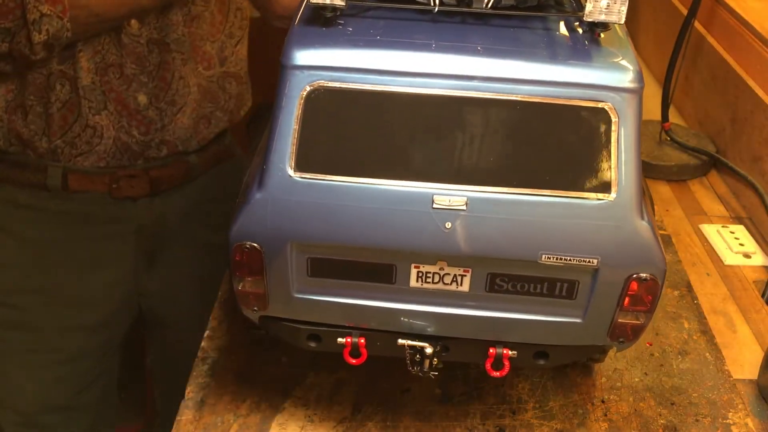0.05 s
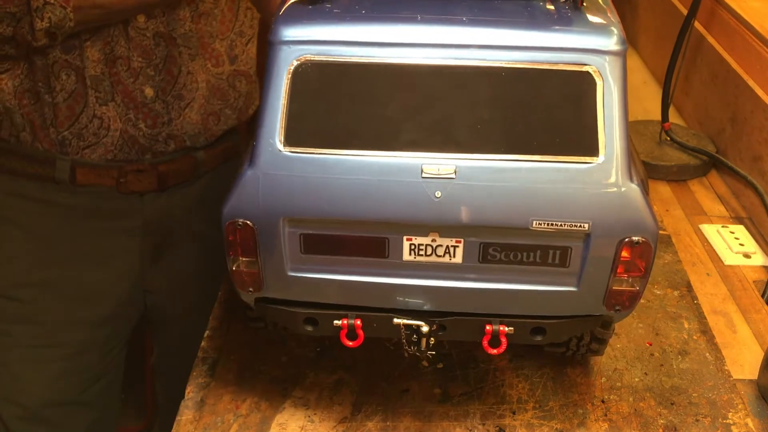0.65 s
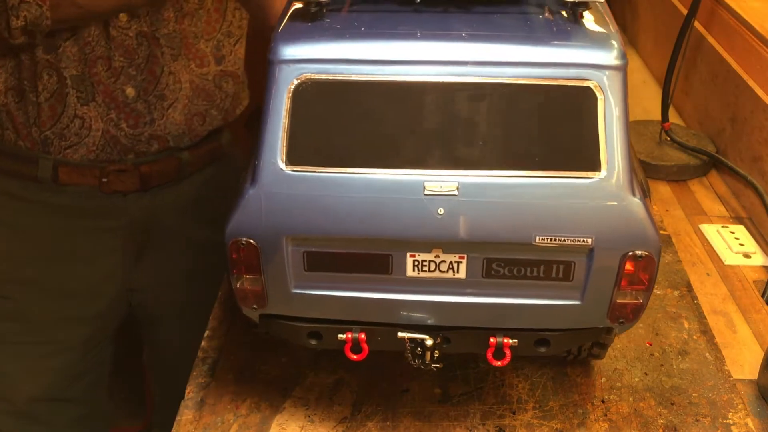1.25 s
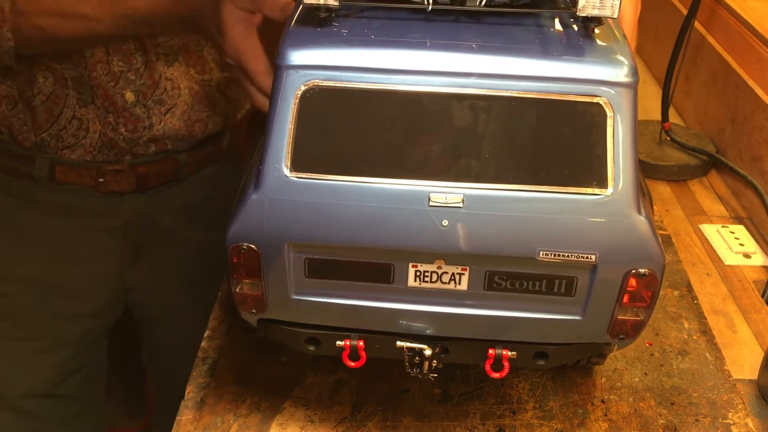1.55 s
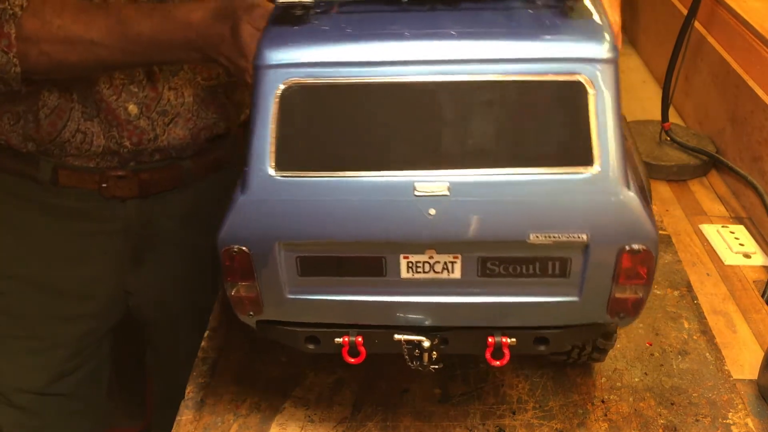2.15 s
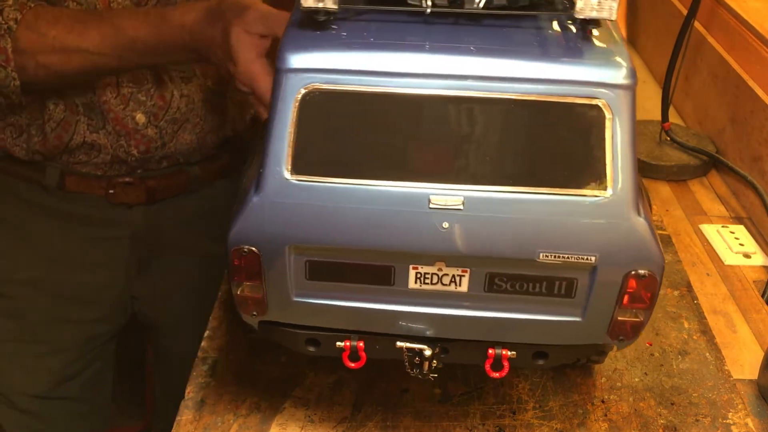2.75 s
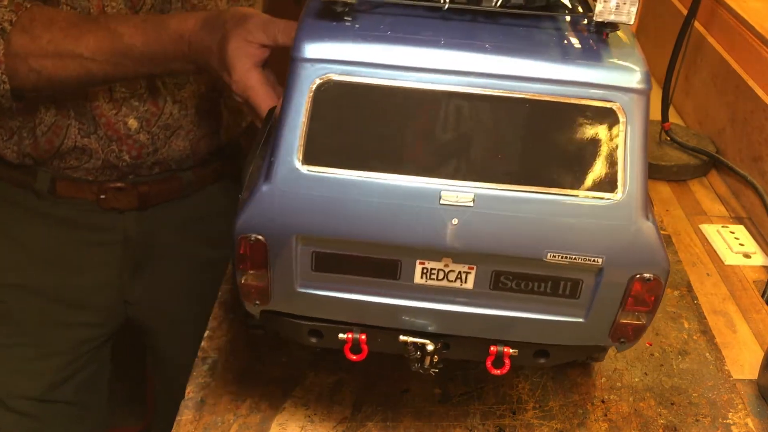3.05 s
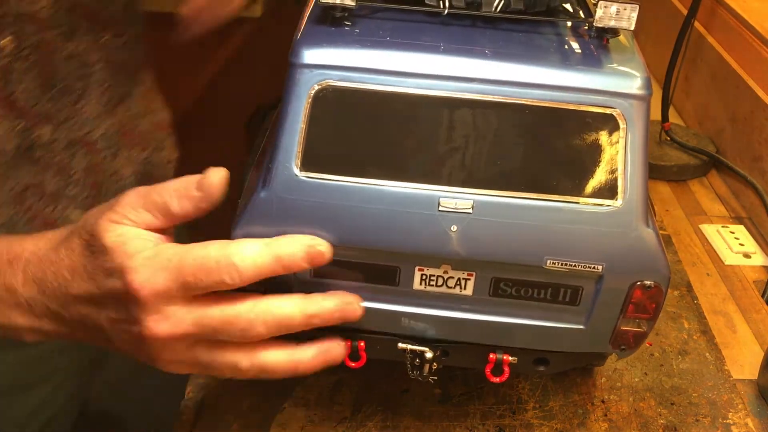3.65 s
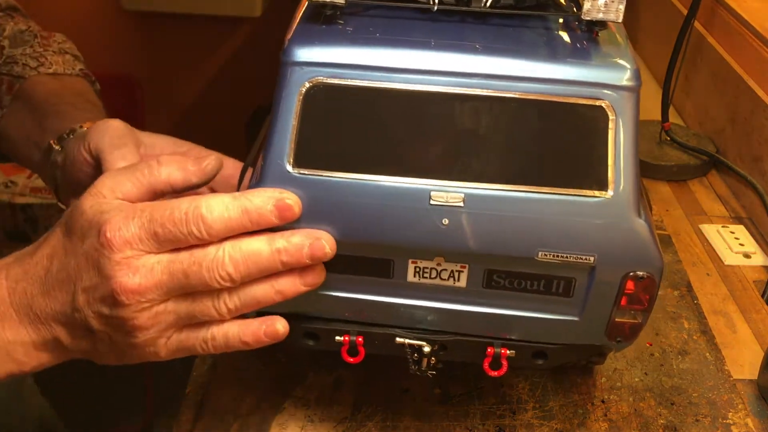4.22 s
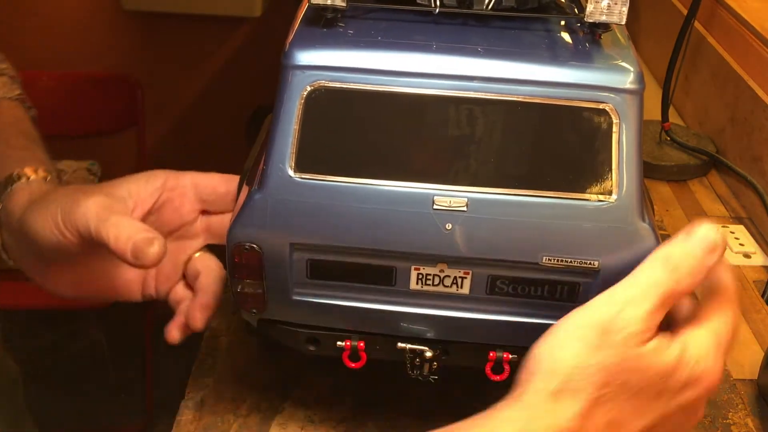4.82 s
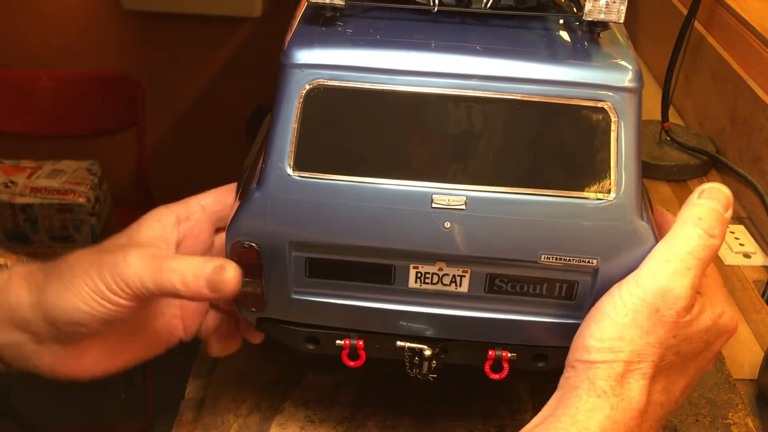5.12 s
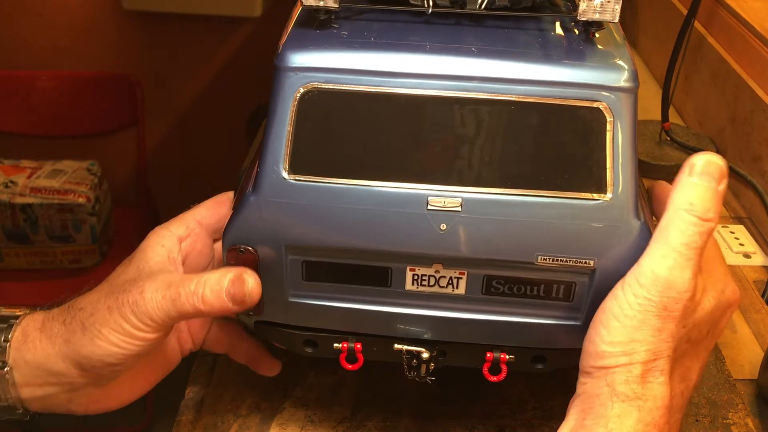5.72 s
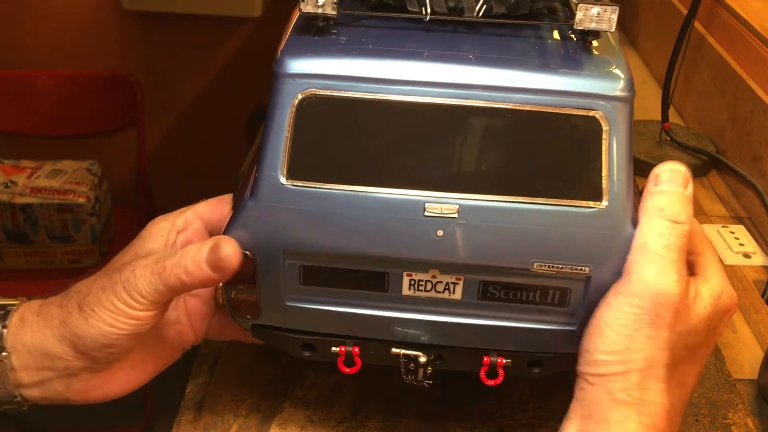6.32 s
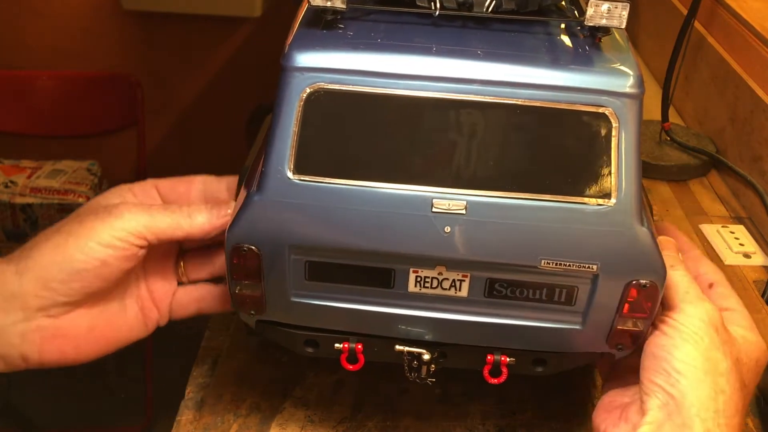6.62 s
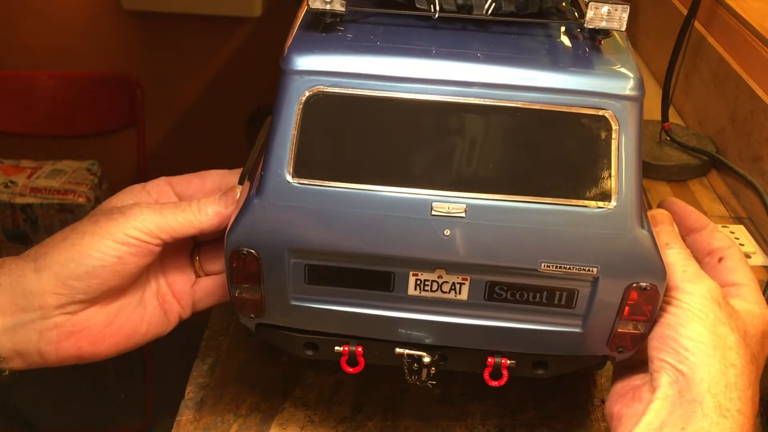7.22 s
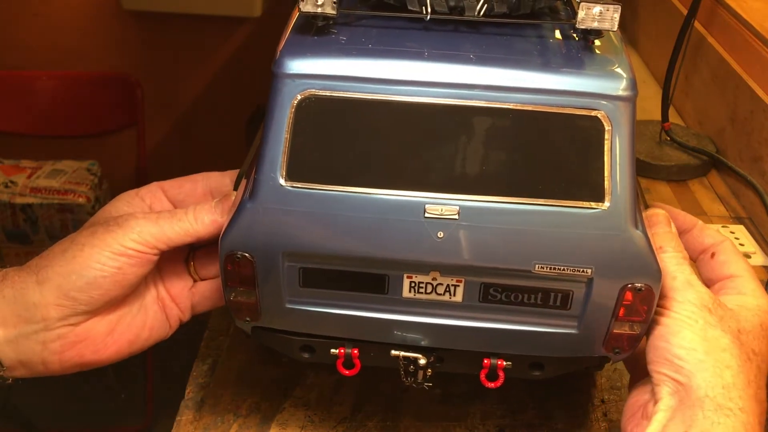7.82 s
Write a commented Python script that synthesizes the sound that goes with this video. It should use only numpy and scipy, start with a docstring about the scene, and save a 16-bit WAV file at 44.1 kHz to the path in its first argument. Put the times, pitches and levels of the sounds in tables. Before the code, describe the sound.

Hands rub and shift a hollow plastic model truck, with light clicks, taps and soft thuds on a wooden bench.

```python
"""Hands rub the thin plastic shell of a model truck, close by, over a faint workshop hum.
Fingertips scuff and tap it, palms bump it, and it clicks against its chassis: each force rings
the shell's panels, with early echoes and a short room decay. The truck thuds on its tyres and
rocks the wooden bench. Later, sleeves swish and the gripped shell creaks by stick-slip."""
import sys
import numpy as np
from scipy import signal
from scipy.fft import rfft, irfft, next_fast_len
from scipy.io import wavfile
from scipy.ndimage import uniform_filter1d, map_coordinates

SR = 44100
rng = np.random.default_rng(int(sys.argv[2]) if len(sys.argv) > 2 else 0)


def int16_out(signal):
    """Quantize to a 16-bit WAV file."""
    q = np.round(np.clip(np.atleast_2d(signal).T, -1, 1) * 32767)
    wavfile.write(sys.argv[1], SR, q.astype(np.int16))


N = 355710
EVENT_SAMPLES = 2 ** 14

# shell resonances: centre_hz, width_hz, level_db
SHELL_MODES = [(214, 38, 0), (284, 23, 5.5), (370.8, 33, 9), (520, 40, 4.5), (613, 94, 3), (745, 26, -8),
               (1115, 300, 2), (1573, 140, -0.5), (1780, 48, -1.5), (1970, 43, -4.5), (2270, 140, -3),
               (2553, 170, -3), (3010, 180, -2), (3380, 120, -5), (3790, 58, -8.5), (5960, 900, -6.5),
               (6500, 590, -8.5)]
# side panel resonances: centre_hz, width_hz, boost_db
PANEL_MODES = [(1123, 48, 9), (1710, 71, -5), (2070, 59, 4), (2730, 130, 3)]
# shell radiation: freq_hz, gain_db
RADIATION = [(25, -34.5), (90, -11), (180, -1.5), (400, -4.5), (4000, -3), (4800, -3.5), (7000, 0.5),
             (10000, 1.5), (12000, 2.5), (15500, -0.5)]
# workshop decay: freq_hz, t60_s
ROOM_DECAY = [(200, 0.25), (700, 0.2), (3000, 0.17), (13000, .165)]

# relative noise spectra: freq_hz, density_db
PALM_SPECTRUM = [(70, -35.5), (125, 5.5), (170, 2), (210, -2), (300, -12.5), (480, -16.5), (800, -30),
                 (2500, -71.5)]
FINGER_SPECTRUM = [(250, -39), (560, 3), (850, 2), (1200, 1), (2300, 0), (4000, -11.5), (6000, -31),
                   (12000, -67.5)]
HISS_SPECTRUM = [(1500, -21), (3900, -2), (5000, -5), (7000, -6), (10000, -3.5), (12000, -3), (15500, -3)]
TREMBLE_SPECTRUM = [(20, -48.5), (40, -11.5), (56, 10), (78, 2), (110, 0), (160, -28.5), (400, -64)]
HUM_SPECTRUM = [(150, -49), (192, -7.5), (208, 3), (220, -10), (260, -37.5)]
AIR_SPECTRUM = [(20, -37), (40, -11), (80, 0.5), (145, -8), (190, -6), (250, -18), (330, -18), (700, -22.5),
                (1400, -25), (2000, -27), (5000, -44.5), (13000, -34.5), (16000, -35.5)]
SLEEVE_SPECTRUM = [(2000, -6), (5000, -8), (8500, -7), (10500, -8), (12200, 1), (14000, -5), (16000, -3)]

# how hard the hands work: time_s, effort_db
EFFORT = [(0.0, -60), (0.52, -54), (0.96, -62), (1.21, -60), (1.46, -65.5), (2.16, -60), (2.36, -58),
          (3.1, -61), (3.46, -69), (4.31, -60.5), (4.56, -64.5), (4.83, -67.5), (5.26, -59.5),
          (5.79, -64.5), (6.27, -60), (7.41, -65), (7.64, -65), (8.07, -67.5)]
# hands sliding on the shell: start_s, end_s, drag_db, hiss_over_drag_db
STROKES = [(0.0, 0.024, -58.5, -0.5), (0.663, 0.82, -60, -1), (0.866, 0.88, -56.5, 0.5),
           (1.283, 1.36, -56, -3.5), (2.277, 2.437, -59.5, -5.5), (2.55, 2.823, -60.5, -8.5),
           (3.12, 3.297, -68, -13), (3.681, 3.72, -60.5, 1), (3.82, 3.992, -65.5, 2),
           (4.093, 4.369, -57, 3), (4.952, 5.02, -61, -2.5), (5.205, 5.447, -64, 0.5),
           (5.605, 5.682, -58.5, -1.5), (5.855, 5.98, -63.5, 1), (6.384, 6.621, -59.5, 1.5),
           (6.765, 6.822, -63, 4), (7.833, 7.906, -73.5, 5), (8.02, 8.064, -69.5, 0)]
# fingertip scuffs: time_s, centre_hz, level_db
SCUFFS = [(0.074, 890, -66), (0.26, 880, -59), (0.347, 890, -50.5), (0.724, 1250, -58),
          (0.855, 1340, -61.5), (1.013, 1480, -60.5), (1.084, 574, -55), (1.675, 925, -59.5),
          (1.738, 790, -56), (1.826, 770, -61.5), (1.896, 1380, -59.5), (2.154, 825, -64),
          (3.695, 1640, -63.5), (3.957, 1710, -67), (4.121, 1620, -55), (4.733, 1340, -68),
          (5.192, 1700, -59), (5.332, 2800, -52.5), (5.429, 1720, -54.5), (6.526, 1730, -55),
          (6.707, 1830, -61), (6.795, 1190, -56.5), (7.089, 1660, -65.5), (7.16, 1900, -62.5),
          (7.247, 1870, -70), (7.78, 1340, -70.5), (7.866, 1680, -62)]
# contacts on the shell: time_s, slip_s, spot_hz, level_db, hardness_db_per_octave
FINGER_TAPS = [(0.123, 0.0019, 555, -52.5, -8), (0.882, 0.0018, 700, -39.5, -3.5),
               (1.378, 0.0068, 1310, -50.5, -1), (5.127, .0032, 2010, -39, 3.1),
               (5.234, .0044, 2050, -52.5, 1.5), (5.37, 0.001, 3230, -44, 2.5),
               (5.382, 0.0026, 2940, -41, 6), (5.763, .0016, 575, -53, -7.5),
               (6.25, .0032, 1150, -59, -0.5), (6.398, 0.000665, 1160, -46.5, 1.3),
               (6.84, 0.0026, 564, -54, -5.5), (7.118, 0.005, 1940, -48.5, 3),
               (7.324, 0.00076, 587, -45.5, -4), (7.407, 0.00068, 1650, -46, -3.5)]
PALM_BUMPS = [(0.229, 0.00076, 380, -51.5, -4.5), (0.667, 0.0038, 390, -51, -4),
              (1.104, .0012, 513, -32.5, -6.5), (1.126, 0.0034, 288, -42.5, -6.5),
              (1.637, .0027, 352, -43, -4.5), (1.72, 0.0032, 287, -49, -4.5),
              (1.752, 0.0069, 405, -45.5, -6), (2.114, 0.0023, 507, -52, -3.5), (2.837, .003, 410, -50, -4),
              (3.176, 0.0041, 1566, -50.5, -4), (5.449, 0.0083, 259.6, -47, -5),
              (6.2, 0.0019, 360, -49.5, -3), (6.225, 0.0045, 246, -50, -3.5), (6.79, .006, 210, -52, -3)]
CHASSIS_CLICKS = [(0.305, 0.00019, 3480, -36.5, 0.6), (0.406, .0017, 380, -53, -0.5),
                  (0.478, 0.0026, 1860, -44.5, 0), (0.499, 0.0051, 625, -40.5, -0.8),
                  (0.53, 0.0049, 590, -40, -2), (0.546, 0.003, 2190, -26.5, 1.74),
                  (1.147, 0.0017, 300, -55.5, -.7), (1.324, .0037, 2190, -42.5, 0.5),
                  (1.447, 0.00046, 670, -51, 1.2), (1.974, 0.0027, 1180, -59.5, 2),
                  (2.221, 0.00047, 7300, -56, 6), (2.258, .0011, 588, -50.5, -2.5),
                  (2.334, 0.0021, 1650, -45, 1.5), (2.352, 0.0024, 1360, -46, -1.2),
                  (2.481, 0.0048, 3860, -20, 1.2), (2.491, .004, 290, -26.5, -1.5),
                  (2.574, 0.0011, 320, -53, 1), (2.659, 0.0013, 1360, -50.5, -0.5),
                  (2.732, 0.00046, 2760, -44.5, -0.3), (2.752, 0.0017, 545, -45, -1),
                  (2.779, 0.0011, 1360, -46, 0.5), (2.817, 0.00068, 2630, -53, 0.8),
                  (2.871, 0.00061, 7000, -50.5, 3.5), (2.976, .0023, 430, -41, -3),
                  (2.992, .0036, 304, -37.5, -3.5), (3.148, 0.0025, 1955, -53.5, -0.9),
                  (4.26, .002, 2680, -49.5, 1.5), (4.977, .0046, 920, -49.5, -1),
                  (5.273, 0.00048, 3230, -47, -0.5), (5.284, 0.0041, 1600, -47, 0),
                  (5.539, 0.0052, 3420, -58.5, .3), (5.5845, 0.000049, 3450, -63, 3.5),
                  (5.955, .007, 2920, -54, .9), (6.145, 0.0008, 3030, -51, 2),
                  (6.427, 0.005, 1620, -55, 2.5), (6.78, 0.0041, 1110, -53, -2.5),
                  (7.467, 0.0047, 5890, -51.5, 8), (7.693, 0.0013, 6730, -62.5, 2.7)]
# bands that shape a contact: edge_hz
BAND_EDGES_HZ = [150, 550, 1600, 4200, 16000]
# truck landing on its tyres: start_s, level_db
THUDS = [(0.314, -39), (0.514, -45), (0.554, -37.5), (0.893, -42.5), (1.422, -47), (2.151, -47.5),
         (2.335, -49), (2.495, -33.5), (2.988, -28), (3.234, -54), (3.70, -39.5), (3.928, -43),
         (3.983, -49.5), (4.449, -51.5), (5.017, -46), (5.429, -48.5), (5.975, -54), (6.408, -48),
         (6.518, -51)]
# modes of the truck on the bench: pitch_hz, level_db, t60_s
BENCH_MODES = [(57.7, -6.5, 0.27), (74, -1, 0.31), (158, -1, 0.19), (199, -12.5, 0.29), (274, -14, 0.13)]
# sleeve swishes: start_s, end_s, level_db
SWISHES = [(3.426, 4.005, -70), (4.497, 4.878, -69)]
# flexed shell creaking: start_s, end_s, slips_per_s, level_db
CREAKS = [(6.039, 6.125, 53, -63.5), (6.197, 6.256, 90, -58)]


def amp(db):
    """Decibels to gain."""
    return 10 ** (np.asarray(db) / 20)


def unit_rms(x):
    """x at rms 1."""
    return x / np.sqrt(np.mean(x ** 2) + 1e-20)


def unit_energy(x):
    """x at energy 1."""
    return x / (np.linalg.norm(x) + 1e-12)


def gain_at(spectrum, hz):
    """Gain of a (freq_hz, level_db) table, read on a log axis."""
    freq_hz, level_db = np.transpose(spectrum)
    return amp(np.interp(np.log(hz + 1), np.log(freq_hz + 1), level_db))


def wobble(rate_hz):
    """Smooth random curve with knots at rate_hz."""
    knots = rng.standard_normal(int(N * rate_hz / SR) + 4)
    return map_coordinates(knots, [np.arange(N) * rate_hz / SR])


def swell(start_s, end_s, rise_s, fall_s):
    """Gain 1 from start to end, exponential flanks."""
    t = np.arange(N) / SR
    outside = np.maximum(start_s - t, 0) / rise_s + np.maximum(t - end_s, 0) / fall_s
    return np.exp(-np.minimum(outside, 20))


def filtered(x, response):
    """x through response(hz)."""
    size = next_fast_len(N + SR // 2)
    return irfft(rfft(x, size) * response(np.fft.rfftfreq(size, 1 / SR)), size)[:N]


def noise(spectrum):
    """Coloured noise, rms 1."""
    return unit_rms(filtered(rng.standard_normal(N), lambda hz: gain_at(spectrum, hz)))


def minimum_phase(gain):
    """Causal response with this gain."""
    cepstrum = irfft(np.log(np.maximum(gain, 1e-6)))
    half = len(cepstrum) // 2
    return np.exp(rfft(np.r_[cepstrum[0], 2 * cepstrum[1:half], np.zeros(half)]))


def add(track, start_s, sound):
    """Mix sound into track."""
    start = max(0, round(start_s * SR))
    track[start:start + len(sound)] += sound[:len(track) - start]


def shell_gain(hz, bed_db):
    """Shell resonances on a bed of weaker ones."""
    peaks = sum(amp(db) ** 2 / (1 + (2 * (hz - centre_hz) / width_hz) ** 2)
                for centre_hz, width_hz, db in SHELL_MODES)
    return np.sqrt(peaks + amp(bed_db) ** 2)


def dense_ring(force, t60_s):
    """Crowded modes ring as noise: force feeds the energy, damping drains it."""
    retained = amp(-60 / (t60_s * SR)) ** 2
    energy = signal.lfilter([1 - retained], [1, -retained], force ** 2)
    return np.sqrt(energy) * rng.standard_normal(len(force))


def early_echoes(hz, level_db=-6.5, spread_s=0.007, count=5, scatter_hz=9000):
    """Comb response of bench top and hollow interior; top treble scatters away."""
    delays_s = spread_s * rng.uniform(0.2, 1, count)
    echoes = sum(np.exp(-2j * np.pi * hz * delay_s) for delay_s in delays_s) / np.sqrt(count)
    return 1 + amp(level_db) * echoes / (1 + 1j * hz / scatter_hz)


def shell_response(force, direct_db=-4, panel_t60_s=0.047, room_db=-3):
    """Spectrum of direct sound, damped panels and room, whose treble dies first."""
    hz = np.fft.rfftfreq(len(force), 1 / SR)
    centres_hz, t60s_s = np.transpose(ROOM_DECAY)
    shares = [np.interp(np.log(hz + 1), np.log(centres_hz), row) for row in np.eye(len(ROOM_DECAY))]
    room = sum(np.sqrt(share) * rfft(dense_ring(force, t60_s)) for share, t60_s in zip(shares, t60s_s))
    shell = rfft(amp(direct_db) * force + dense_ring(force, panel_t60_s))
    return (shell + amp(room_db) * room) * early_echoes(hz)


def stroke_gains(rise_s=0.03, fall_s=0.04):
    """Drag and hiss gains of the sliding hands."""
    drag, hiss = np.zeros(N), np.zeros(N)
    for start_s, end_s, drag_db, hiss_over_drag_db in STROKES:
        gain = amp(drag_db) * swell(start_s, end_s, rise_s, fall_s)
        drag = np.maximum(drag, gain)
        hiss = np.maximum(hiss, amp(hiss_over_drag_db) * gain)
    return drag, hiss


def rubbing(spectrum, grains_per_s, grain_db, bed_db):
    """Smooth sliding plus stick-slip grains, through shell and room; rms 1."""
    size = next_fast_len(N)
    grains = (rng.random(size) < grains_per_s / SR) * rng.standard_normal(size)
    force = rng.standard_normal(size) + amp(grain_db) * unit_rms(grains)
    sound = irfft(shell_response(force))[:N]
    return unit_rms(filtered(sound, lambda hz: gain_at(spectrum, hz) * shell_gain(hz, bed_db)))


def colour_drift(rub, depth_db=3):
    """A rub changes colour as skin moves from spot to spot."""
    frames = signal.stft(rub, nperseg=1024)[2]
    patches = uniform_filter1d(rng.standard_normal(frames.shape), size=5, axis=0)
    patches = uniform_filter1d(patches, size=9, axis=1)
    return signal.istft(frames * amp(depth_db * unit_rms(patches)))[1][:N]


def hands(usual_effort_db=-60):
    """Effort and strokes drive palm rub, finger friction, hiss and bench tremble."""
    effort_db = np.interp(np.arange(N) / SR, *np.transpose(EFFORT)) - usual_effort_db
    drag, stroke_hiss = stroke_gains()
    pressure = amp(1.3 * wobble(rate_hz=35) + 0.73 * wobble(rate_hz=180))
    palm_gain = np.hypot(amp(-2) * drag, amp(-60 + 1.1 * effort_db))
    finger_gain = amp(-4) * np.hypot(drag, amp(-72 + 0.78 * effort_db))
    hiss_gain = np.hypot(stroke_hiss, amp(-80 + 0.78 * effort_db))
    tremble_gain = np.hypot(amp(-4) * drag, amp(-62 + 0.7 * effort_db))
    palm = palm_gain * rubbing(PALM_SPECTRUM, grains_per_s=78, grain_db=-6, bed_db=-4.5)
    fingers = finger_gain * rubbing(FINGER_SPECTRUM, grains_per_s=70, grain_db=-1, bed_db=-1.5)
    hiss = hiss_gain * rubbing(HISS_SPECTRUM, grains_per_s=140, grain_db=-0.5, bed_db=-11)
    tremble = tremble_gain * noise(TREMBLE_SPECTRUM)
    return tremble + pressure * colour_drift(palm + fingers + hiss)


def workshop(hum_db=-67, air_db=-66.5):
    """Wavering narrow-band hum and still air."""
    return amp(hum_db) * noise(HUM_SPECTRUM) + amp(air_db) * noise(AIR_SPECTRUM)


def side_panel(force, centre_hz, reach_octaves, bed_db):
    """Soft force on the side panel wakes resonances around one pitch; energy 1."""
    hz = np.fft.rfftfreq(len(force), 1 / SR)
    reach = 1 / (1 + (np.log2((hz + 1) / centre_hz) / reach_octaves) ** 2)
    panel_db = sum(db / (1 + (2 * (hz - mode_hz) / width_hz) ** 2)
                   for mode_hz, width_hz, db in PANEL_MODES)
    colour = minimum_phase(reach * amp(panel_db) * shell_gain(hz, bed_db))
    return unit_energy(irfft(shell_response(force) * colour))


def catches():
    """Spiky friction noise, one event long."""
    return rng.standard_normal(EVENT_SAMPLES) * rng.exponential(1, EVENT_SAMPLES)


def scuffs(half_width_s=0.027):
    """Skin drags over hollow plastic in short grainy swells."""
    out, t = np.zeros(N), np.arange(EVENT_SAMPLES) / SR
    lead_s = 2 * half_width_s
    for time_s, centre_hz, level_db in SCUFFS:
        force = catches() * np.exp(-((t - lead_s) / half_width_s) ** 2)
        sound = side_panel(force, centre_hz, reach_octaves=1.4, bed_db=-8)
        add(out, time_s - lead_s, amp(level_db) * np.sqrt(lead_s * SR) * sound)
    return out


def slip_force(slip_s, main_catch=0.83, brief_s=0.0031):
    """Tiny catches crowd round a main one, stronger in brief slips; returns force, lead_s."""
    t = np.arange(EVENT_SAMPLES) / SR
    lead = round(3 * slip_s * SR)
    force = unit_energy(catches() * np.exp(-abs(t - lead / SR) / slip_s))
    force[lead] += main_catch * np.exp(-slip_s / brief_s)
    return force, lead / SR


def contacts(rows, arch_db_per_octave2, spot_db, pivot_hz=1640, hold_s=0.03):
    """Blows shake the thin panels: hardness tilts the spectrum, the spot struck adds a peak."""
    out, hz = np.zeros(N), np.fft.rfftfreq(EVENT_SAMPLES, 1 / SR)
    edges_hz = np.array(BAND_EDGES_HZ)
    centres_hz = np.sqrt(edges_hz[:-1] * edges_hz[1:])
    octaves = np.log2(centres_hz / pivot_hz)
    for time_s, slip_s, spot_hz, level_db, hardness_db_per_octave in rows:
        force, lead_s = slip_force(max(slip_s, 1e-4))
        blow = shell_response(force)
        half_width_hz = 90 + 0.061 * spot_hz
        spot = amp(spot_db / (1 + ((hz - spot_hz) / half_width_hz) ** 2))
        colour = shell_gain(hz, bed_db=-3) * spot * gain_at(RADIATION, hz)
        shape_db = hardness_db_per_octave * octaves - arch_db_per_octave2 * octaves ** 2
        band_db = level_db + 20 * np.log10(unit_energy(amp(shape_db)))
        # each band carries the energy of its level held for hold_s
        power = abs(blow * colour) ** 2 * 2 / EVENT_SAMPLES / (hold_s * SR)
        held_db = 10 * np.log10(np.histogram(hz, edges_hz, weights=power)[0])
        tilt = amp(np.interp(np.log(hz + 1), np.log(centres_hz), band_db - held_db))
        add(out, time_s - lead_s, irfft(blow * minimum_phase(colour * tilt)))
    return out


def thuds(attack_s=0.006, scatter_db=0.35, detune=0.03):
    """The truck settles on soft tyres and rocks the bench."""
    out, t = np.zeros(N), np.arange(SR // 2) / SR
    for start_s, level_db in THUDS:
        ring = np.zeros(len(t))
        for pitch_hz, mode_db, t60_s in BENCH_MODES:
            level_draw, pitch_draw = rng.standard_normal(2)
            decay = amp(mode_db + scatter_db * level_draw - 60 * t / t60_s)
            ring += decay * np.sin(2 * np.pi * pitch_hz * (1 + detune * pitch_draw) * t)
        add(out, start_s, amp(level_db) * ring * (1 - np.exp(-t / attack_s)))
    return out


def sleeves(fade_s=0.1):
    """Cloth brushes cloth as the arms reach round, faint and very high."""
    gain = sum(amp(db) * swell(start_s, end_s, fade_s, fade_s) for start_s, end_s, db in SWISHES)
    return gain * noise(SLEEVE_SPECTRUM)


def creaks(centre_hz=1500, unevenness=0.087):
    """The gripped shell sticks and slips in short uneven trains."""
    out = np.zeros(N)
    for start_s, end_s, slips_per_s, level_db in CREAKS:
        length_s = end_s - start_s
        gaps_s = np.exp(unevenness * rng.standard_normal(16)) / slips_per_s
        times_s = np.cumsum(gaps_s) - gaps_s[0]
        slip_samples = (times_s[times_s < length_s] * SR).astype(int)
        force = np.bincount(slip_samples, minlength=EVENT_SAMPLES).astype(float)
        sound = side_panel(force, centre_hz, reach_octaves=0.78, bed_db=-0.5)
        add(out, start_s, amp(level_db) * np.sqrt(length_s * SR) * sound)
    return out


def scene():
    """All sources, close by, mono."""
    clicks = contacts(CHASSIS_CLICKS, arch_db_per_octave2=0.5, spot_db=9.5)
    taps = contacts(FINGER_TAPS, arch_db_per_octave2=3, spot_db=13)
    bumps = contacts(PALM_BUMPS, arch_db_per_octave2=-0.18, spot_db=8)
    return (clicks + taps + bumps + thuds() + scuffs() + creaks() + hands() + sleeves() + workshop())[None]


def record(dry, low_cut_hz=24, top_hz=15950):
    """Deep bass cut and steep treble limit."""
    low_cut = lambda hz: (1j * hz / (1j * hz + low_cut_hz)) ** 2
    high_cut = lambda hz: 1 / np.sqrt(1 + (hz / top_hz) ** 200)
    return np.array([filtered(channel, lambda hz: low_cut(hz) * high_cut(hz)) for channel in dry])


dry = scene()
out = record(dry)
int16_out(out)
```